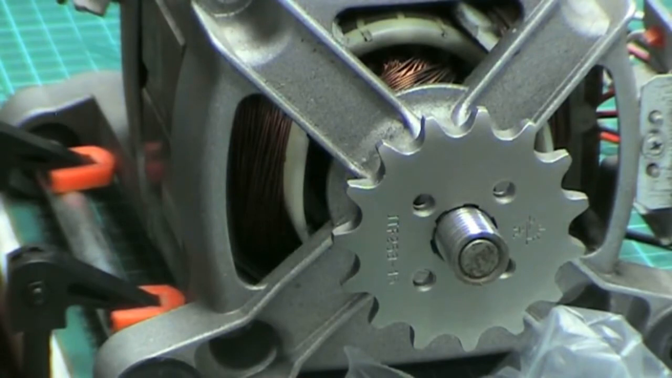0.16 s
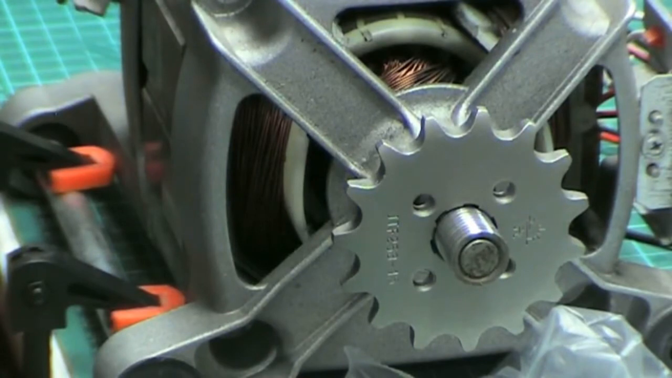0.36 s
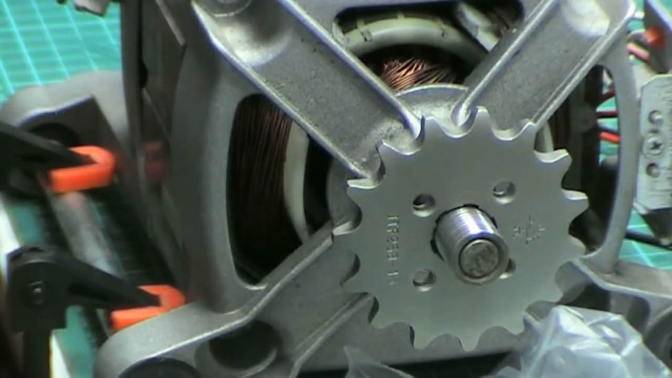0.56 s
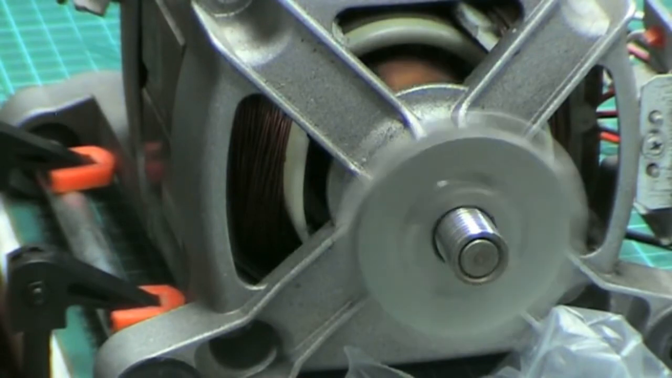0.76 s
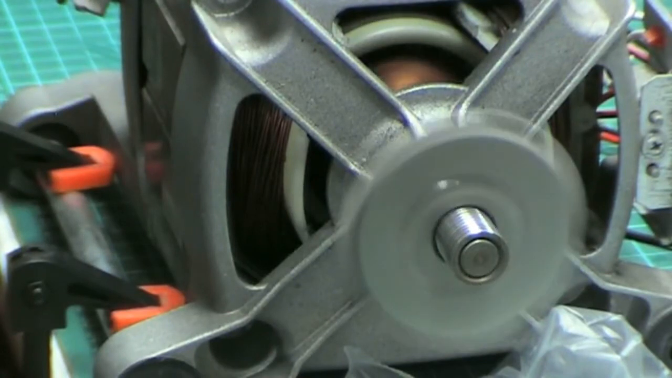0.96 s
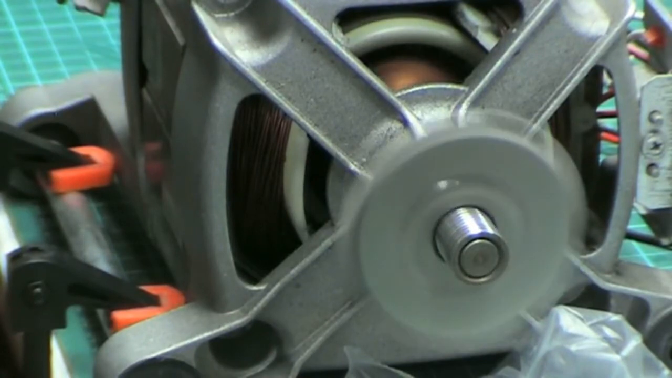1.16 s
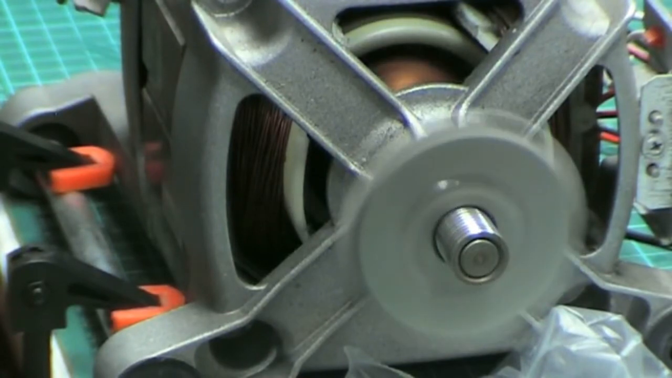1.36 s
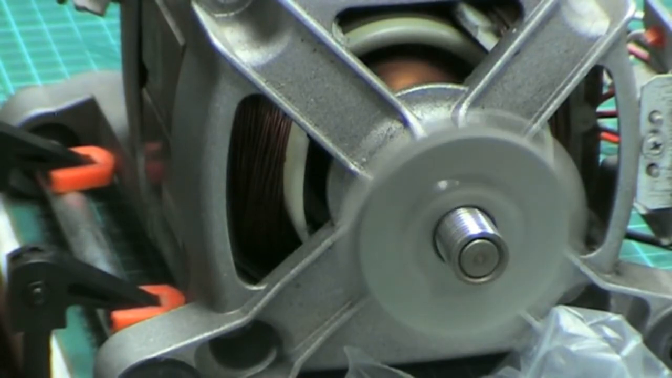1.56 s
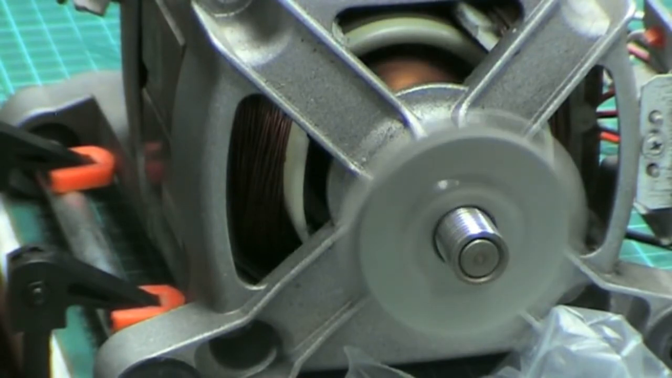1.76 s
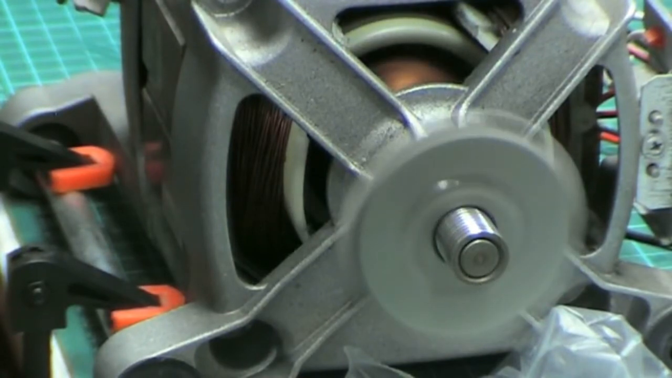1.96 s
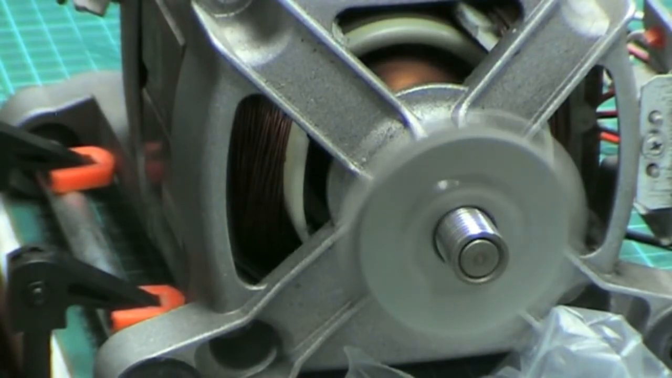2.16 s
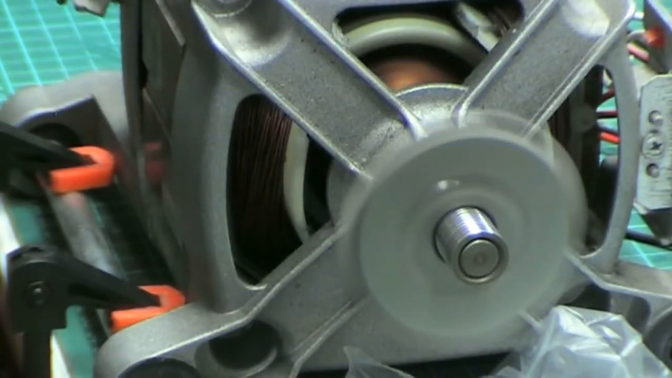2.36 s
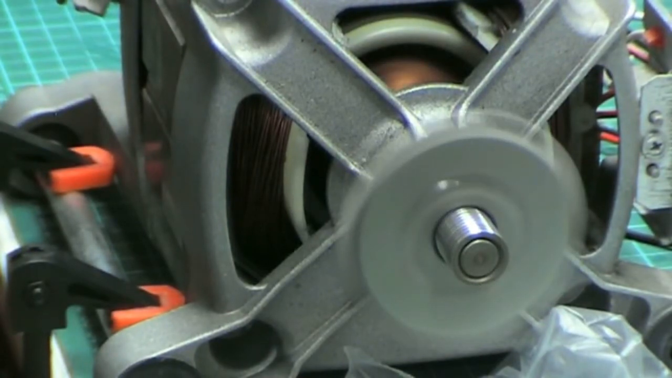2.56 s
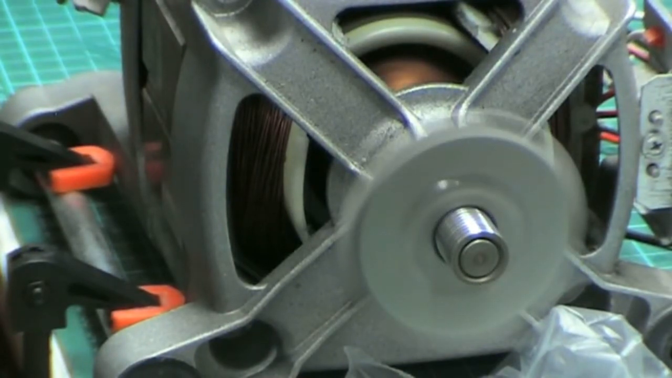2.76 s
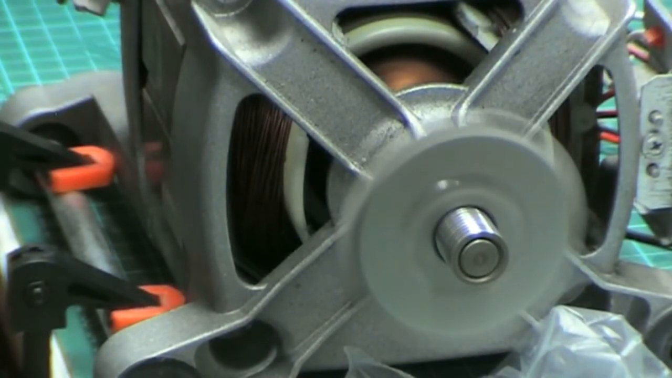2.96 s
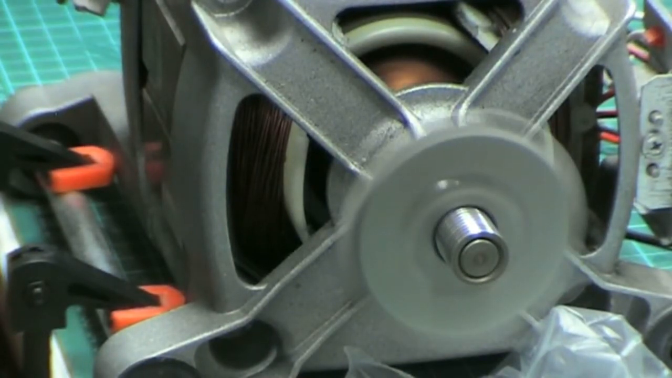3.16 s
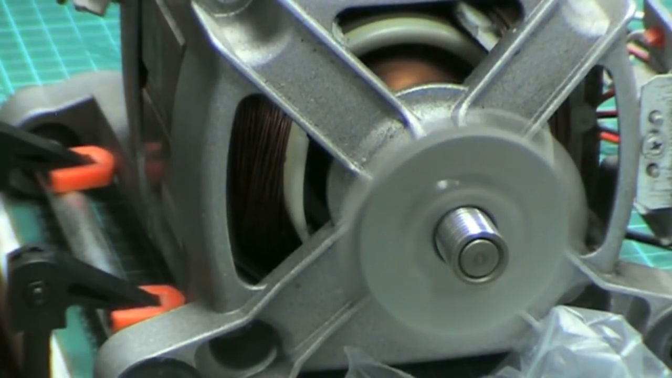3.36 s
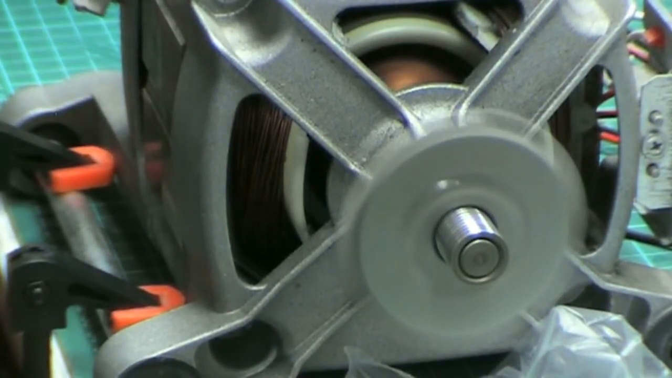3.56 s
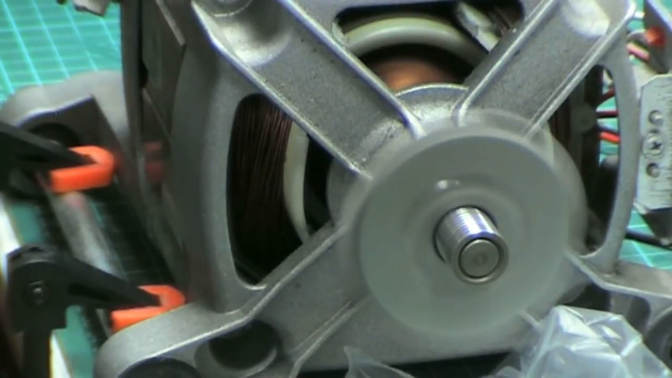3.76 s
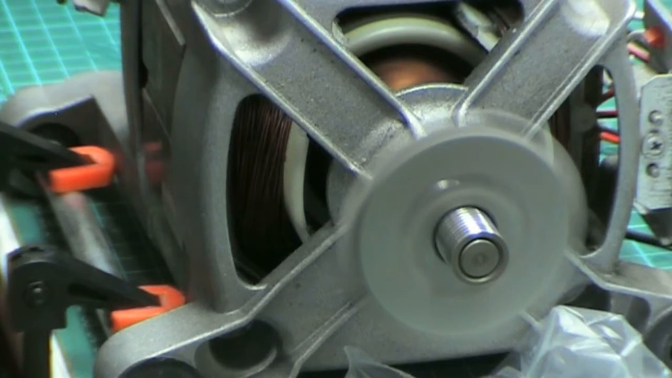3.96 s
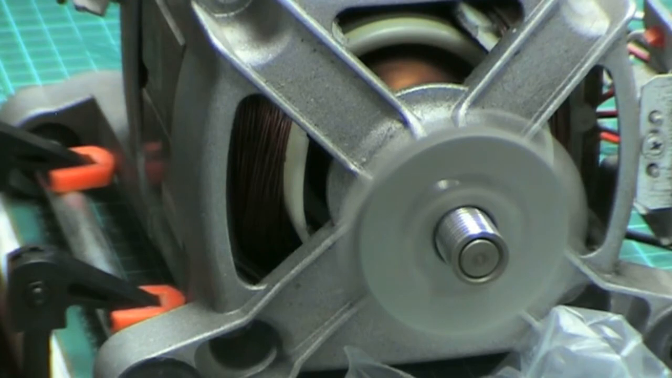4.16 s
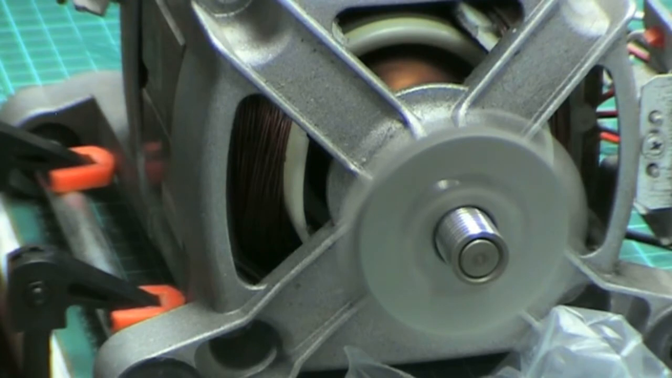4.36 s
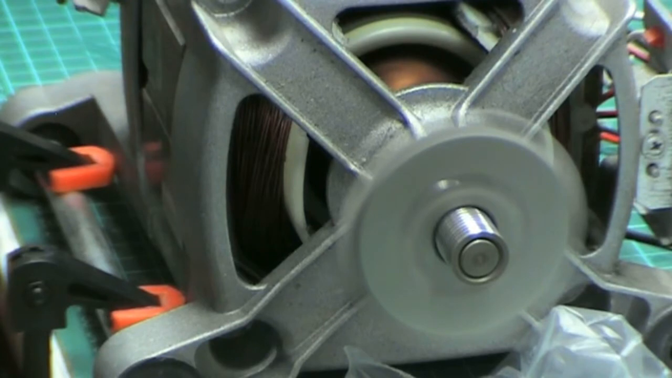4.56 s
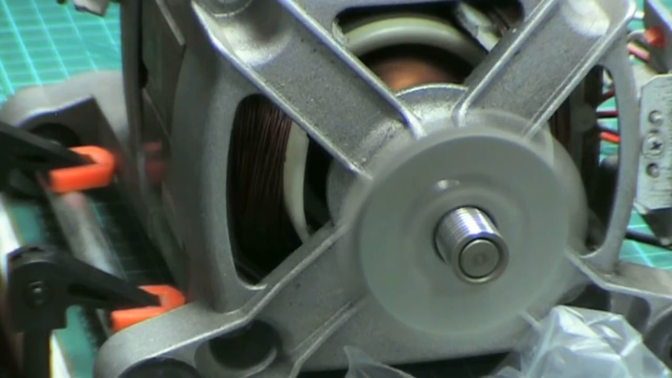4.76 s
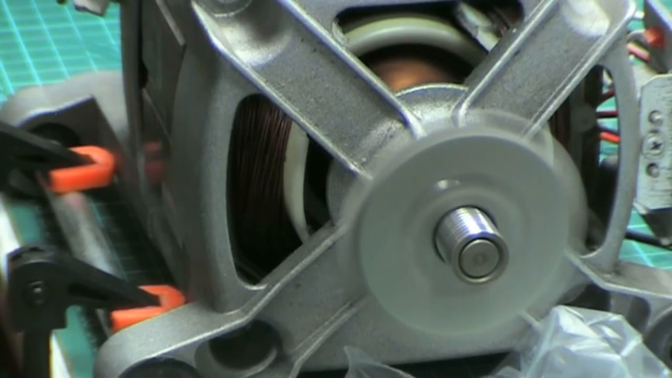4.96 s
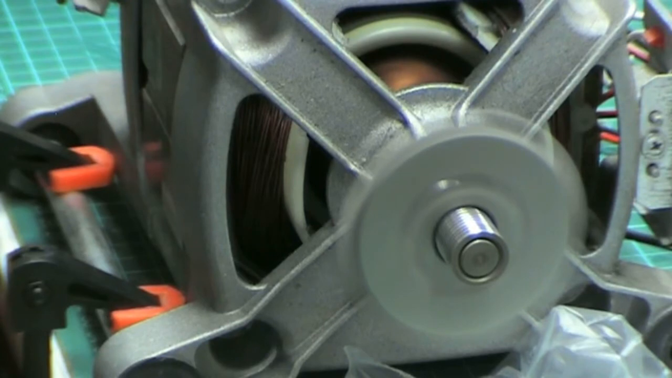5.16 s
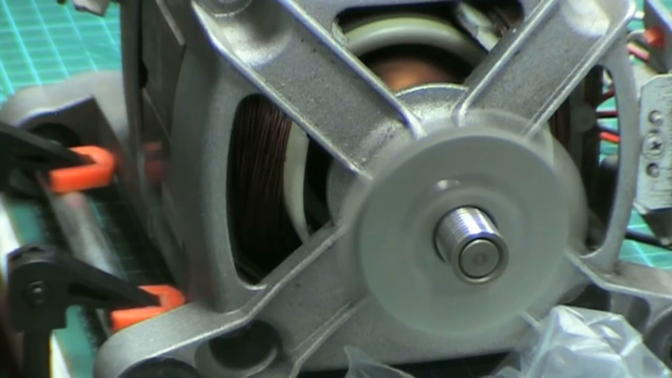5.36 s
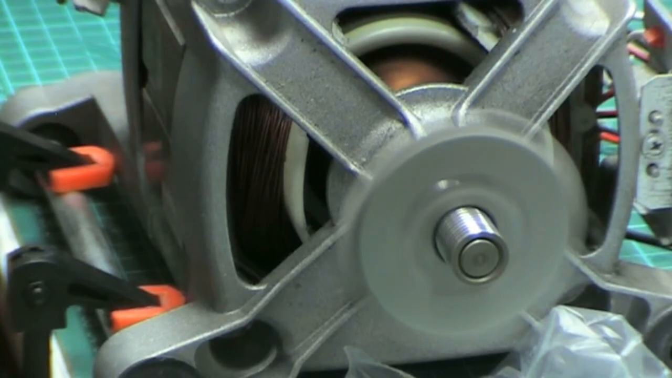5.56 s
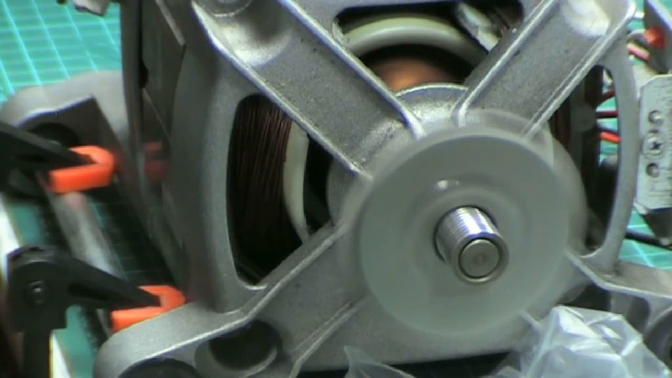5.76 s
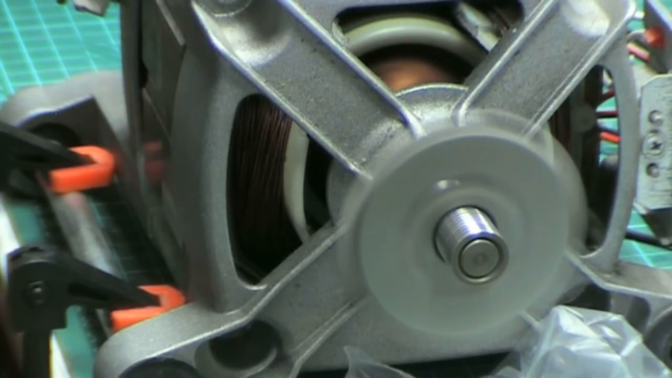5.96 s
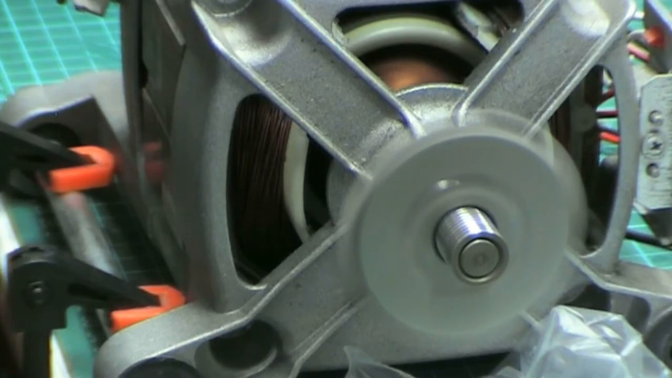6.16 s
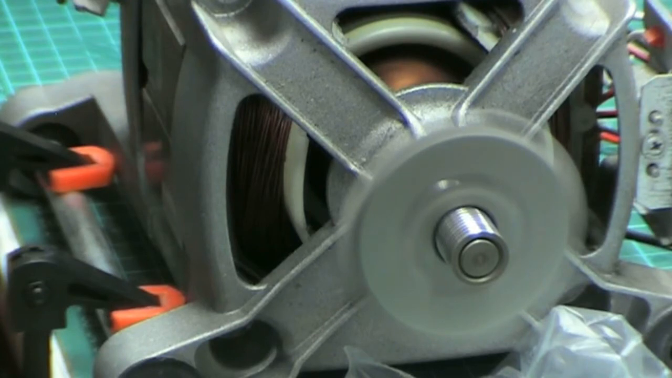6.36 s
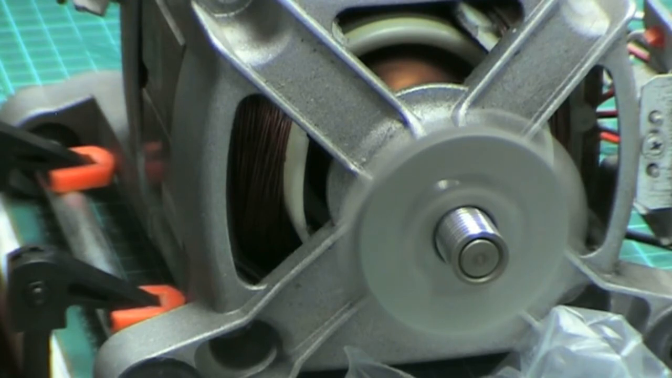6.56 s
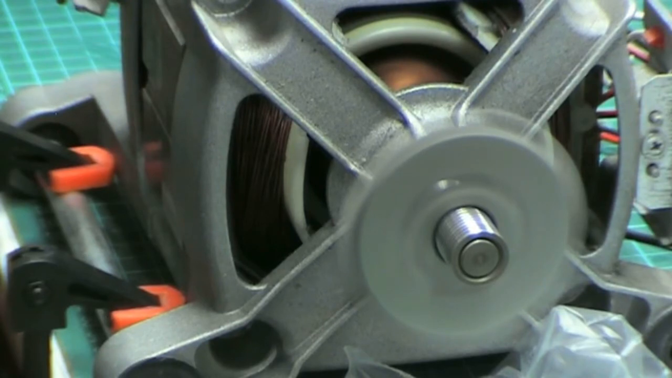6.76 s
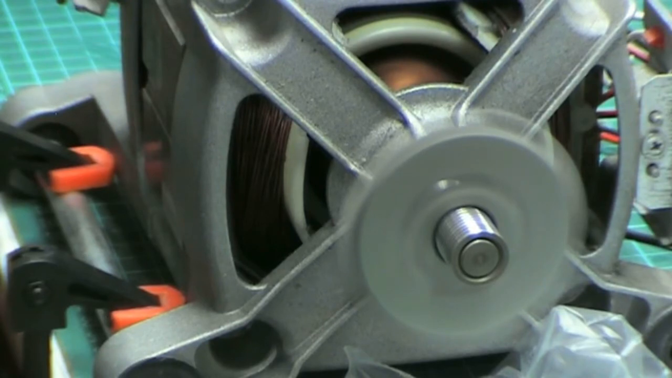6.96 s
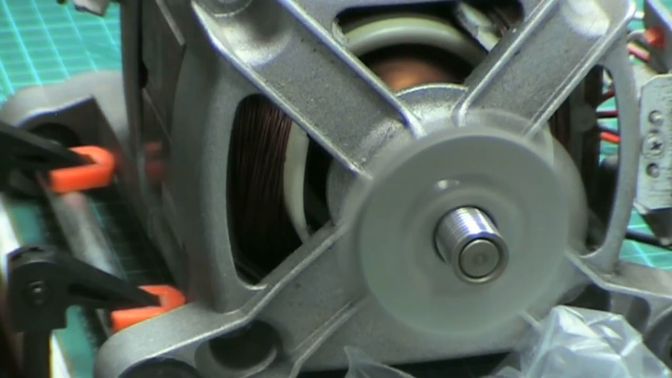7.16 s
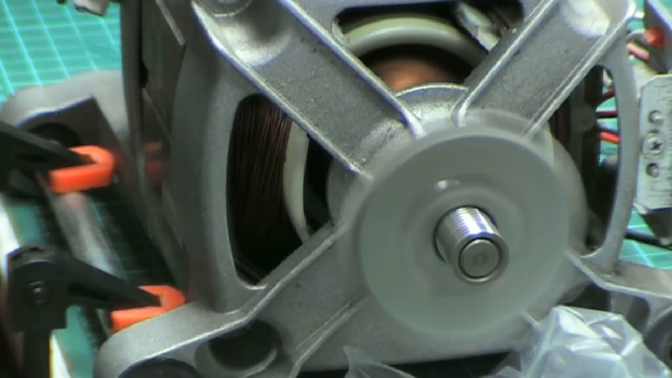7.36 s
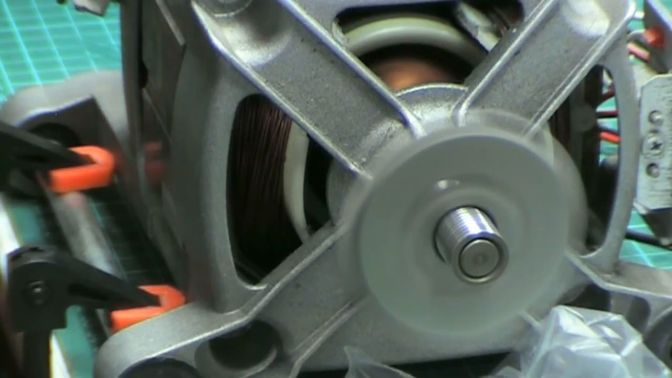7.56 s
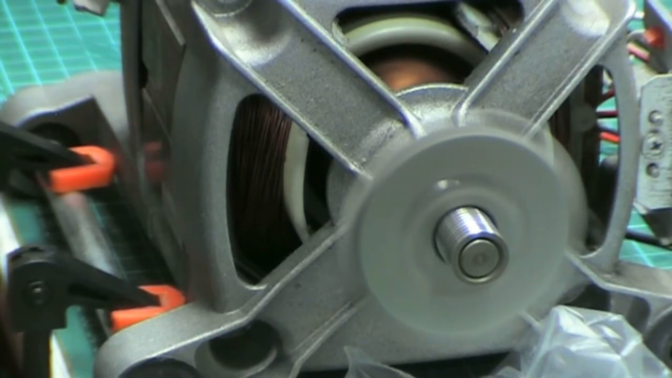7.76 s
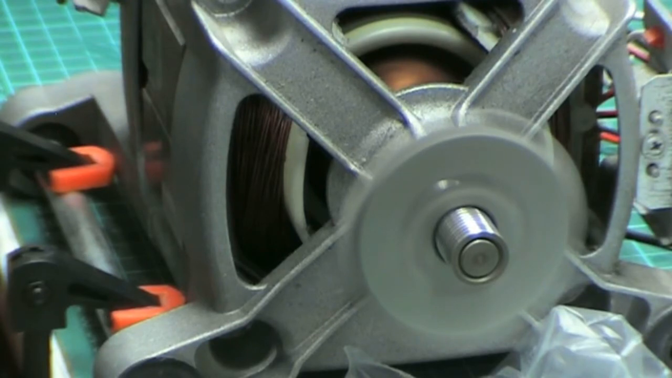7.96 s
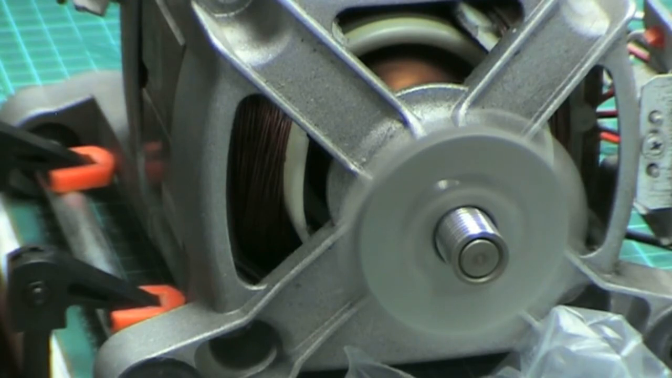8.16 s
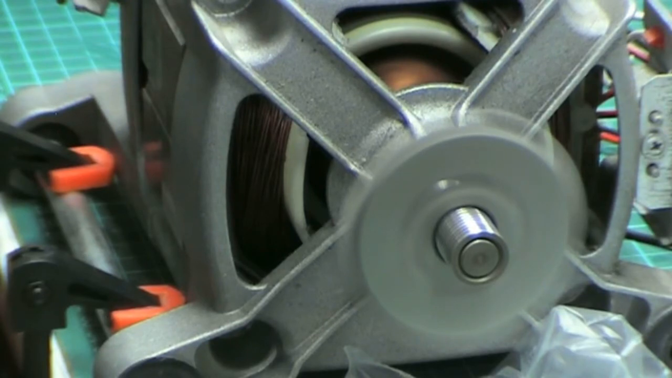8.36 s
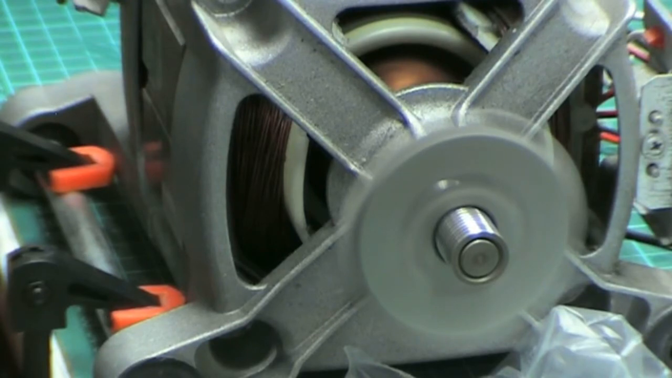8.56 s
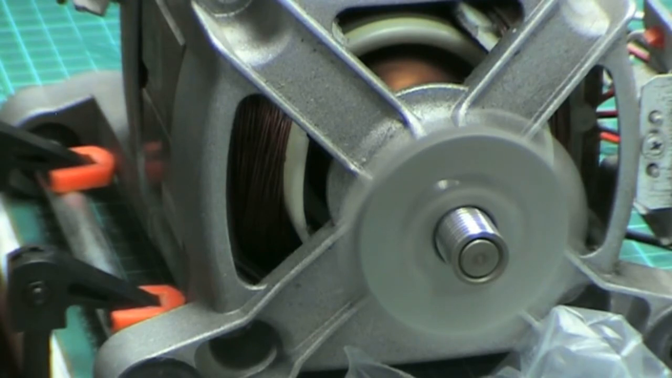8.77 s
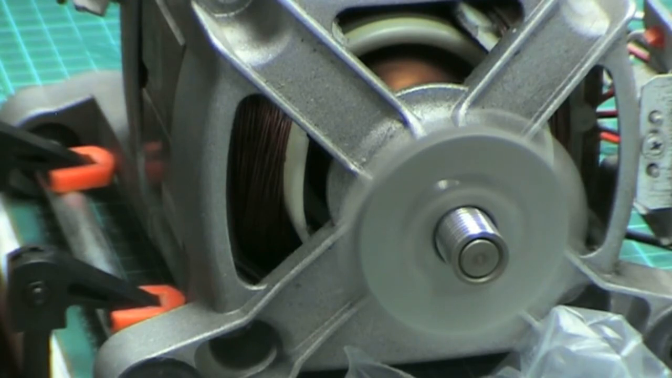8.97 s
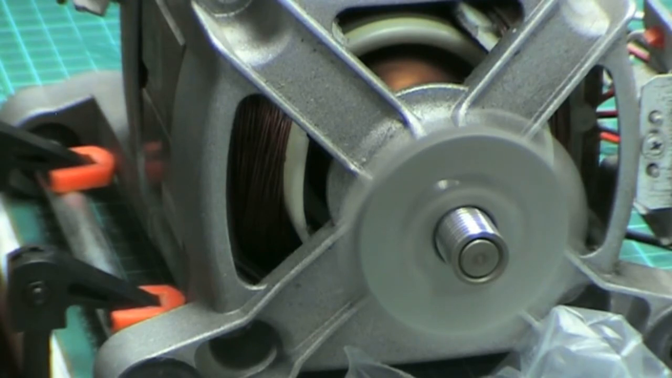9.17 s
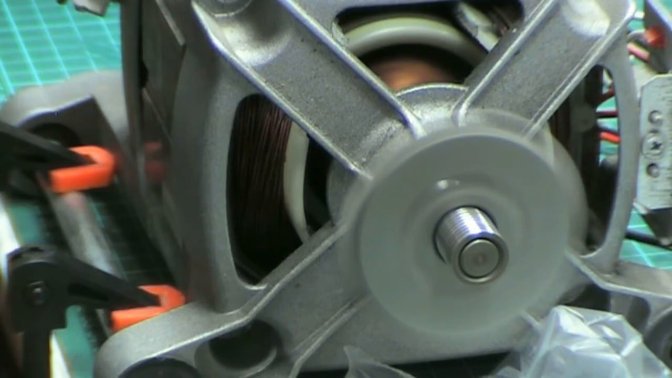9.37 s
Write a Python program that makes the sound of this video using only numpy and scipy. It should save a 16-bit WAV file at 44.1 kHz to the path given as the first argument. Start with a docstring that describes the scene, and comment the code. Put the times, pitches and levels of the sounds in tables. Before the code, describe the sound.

A sharp switch click starts an electric motor, which rises to an even whine with brush hiss, followed by a last click.

```python
"""A bare brushed motor with a sprocket runs up on a workbench and settles near 41 turns a second.
Commutator bars, rotor and ball bearings sing through the resonances of the cast frame, over brush hiss;
on the way up a loose bearing rattles, the bench buzzes and a brush squeals. A switch snaps on amid lighter
lever clicks and dull bench knocks, and snaps again at the very end. The quiet workshop hums and echoes."""
import sys
import numpy as np
from scipy import signal
from scipy.fft import rfft, irfft, next_fast_len
from scipy.io import wavfile
from scipy.ndimage import uniform_filter1d, minimum_filter1d, map_coordinates

SR = 44100
rng = np.random.default_rng(int(sys.argv[2]) if len(sys.argv) > 2 else 0)


def wrap_up_sound(samples):
    """Save the sound to the file named by the first command line argument, as 16-bit audio."""
    columns = np.atleast_2d(samples).T
    # keep every value between -1 and 1, then stretch to whole-number steps
    tamed = np.clip(columns, -1, 1)
    steps = np.round(tamed * 32767).astype(np.int16)
    wavfile.write(sys.argv[1], SR, steps)


N = 415422


def amp(db):
    """Gain of a level in dB."""
    return 10 ** (np.asarray(db) / 20)


def unit_rms(x):
    """x scaled to rms 1."""
    return x / np.sqrt(np.mean(x ** 2) + 1e-20)


def along(points, hz):
    """Interpolate (f/Hz, value) points on a log axis."""
    f, values = np.transpose(points)
    return np.interp(np.log(hz + 1), np.log(f + 1), values)


def wobble(rate_hz):
    """Smooth random curve with rate_hz knots a second."""
    knots = rng.standard_normal(int(N * rate_hz / SR) + 4)
    return map_coordinates(knots, [np.arange(N) * rate_hz / SR])


def filtered(x, response):
    """x through the zero-phase gain response(hz)."""
    size = next_fast_len(x.shape[-1] + 8192)
    return irfft(rfft(x, size) * response(np.fft.rfftfreq(size, 1 / SR)), size)[..., :x.shape[-1]]


def resonances(modes, hz):
    """Summed power of (f/Hz, width/Hz, level/dB) modes."""
    return sum(amp(db) ** 2 / (1 + (2 * (hz - centre) / width) ** 2) for centre, width, db in modes)


def spread(pair, coherence):
    """Two unrelated signals mixed to stereo with the given left-right coherence."""
    angle = lambda hz: np.arccos(np.clip(along(coherence, hz), -1, 1)) / 2
    mid, side = filtered(pair, lambda hz: np.array([np.cos(angle(hz)), np.sin(angle(hz))]))
    return np.array([mid + side, mid - side])


def flicker(x, depth_db):
    """Random gain in patches of frequency and time, mean power kept."""
    spectra = signal.stft(x, nperseg=1024)[2]
    patches = uniform_filter1d(uniform_filter1d(rng.standard_normal(spectra.shape), 3, axis=0), 12, axis=1)
    gain = amp(depth_db * unit_rms(patches) - depth_db ** 2 * np.log(10) / 20)
    return signal.istft(spectra * gain, nperseg=1024)[1][:N]


# Air noise spectrum: f/Hz, relative density/dB
AIR_SPECTRUM = [(15, -50), (40, -34), (90, -28), (180, -11), (280, -5), (830, -2), (1300, -5), (2500, -10),
                (3530, -7.5), (4200, -12), (8000, -18), (14300, -26), (15500, -50)]
# Air noise stereo image: f/Hz, coherence
AIR_COHERENCE = [(60, 0.38), (240, 0.15), (950, 0.41), (3770, 0.75), (15000, 0.0)]
# Mains hum and a faint room tone: f/Hz, level/dB
HUM_TONES = [(120, -71), (240, -83.5), (836, -71)]


def workshop():
    """Soft air noise and mains hum, both wavering slightly."""
    t = np.arange(N) / SR
    air = spread(filtered(rng.standard_normal((2, N)), lambda hz: amp(along(AIR_SPECTRUM, hz))),
                 AIR_COHERENCE)
    hum = sum(np.sqrt(2) * amp(db + 0.42 * wobble(2.66)) * np.sin(2 * np.pi * hz * t)
              for hz, db in HUM_TONES)
    return amp(-62.5 + 1.6 * wobble(4.6)) * unit_rms(air) + hum


# Room decay: f/Hz, t60/s
ROOM_T60 = [(300, 0.1), (800, 0.41), (2000, 0.42), (5500, 0.3), (13000, 0.26)]
# Stereo image of echoes and switch: f/Hz, coherence
FAR_COHERENCE = [(60, 0.96), (240, 0.89), (950, 0.86), (3770, 1), (15000, 0.14)]


def in_room(start_s, direct, send):
    """Stereo track with a direct sound at start_s and the room's echo of send."""
    hz, t, spectra = signal.stft(rng.standard_normal((2, SR // 2)), SR, nperseg=128)
    decay = amp(-60 * t / along(ROOM_T60, hz)[:, None])
    tail = spread(signal.istft(spectra * decay, SR, nperseg=128)[1], FAR_COHERENCE)
    tail /= np.linalg.norm(tail[0])
    sound = signal.fftconvolve(np.pad(send, (60, 0))[None], tail, axes=1)
    sound[:, :direct.shape[1]] += direct
    return np.pad(sound, ((0, 0), (round(start_s * SR), N)))[:, :N]


# Knocks through the bench: t/s, level/dB, f/Hz, t60/s
BENCH_KNOCKS = [(0.496, -58, 252, 0.18), (0.743, -39.5, 695, 0.17), (.775, -43, 417, 0.26),
                (.99, -42, 850, 0.09), (2.51, -41, 570, 0.27), (2.511, -33, 1800, .07),
                (9.363, -43, 735, 0.11)]


def bench_knocks():
    """Dull thuds: a broad noise band with a soft attack and a quick decay."""
    out, t = np.zeros((2, N)), np.arange(SR // 4) / SR
    attack = 1 - np.exp(-t / 0.0015)
    for start_s, db, centre_hz, t60_s in BENCH_KNOCKS:
        mode = [(centre_hz, 1.34 * centre_hz, 0)]
        band = filtered(rng.standard_normal(len(t)),
                        lambda hz: resonances(mode, hz) * hz ** 2 / (hz ** 2 + 250 ** 2))
        thud = amp(db - 60 * t / t60_s) * attack * unit_rms(band)
        out += in_room(start_s, np.array([thud, thud]), send=amp(-2) * thud)
    return out


# Switch throws: t/s, peak before limiting/dB, tilt/(dB/octave)
SWITCH_THROWS = [(.7335, 4, 2), (9.3617, 3, .7)]
# Lighter lever clicks: t/s, peak/dB, tilt/(dB/octave), room send/dB
LEVER_CLICKS = [(.630, -35.5, 0, 11.5), (.835, -20, 4, 14), (0.9639, -24.5, 3.5, 18),
                (1.194, -18.5, 3.5, 13)]
# Snap spectrum: f/Hz, gain/dB
SNAP_SPECTRUM = [(300, -15), (1400, -18.5), (2400, -2), (3400, -5.5), (5000, 0.4), (7500, -2.5),
                 (10000, -1.5), (13000, 2), (15500, -8)]
# Switch case modes: f/Hz, width/Hz, level/dB
CASE_MODES = [(2450, 400, 3.5), (4970, 500, 7), (7240, 640, 5.5), (9100, 630, 8)]


def switch():
    """Each snap is a blow and a quick rebound that ring the case; a faint tick leads each throw."""
    out, t = np.zeros((2, N)), np.arange(SR // 40) / SR - .001
    rebound_s, t60_s, lead_s, edge_hz = .0013, .0075, .0049, 10900
    throws = [(s, db, tilt, 6) for s, db, tilt in SWITCH_THROWS]  # columns as LEVER_CLICKS
    ticks = [(s - lead_s, db - 30, 9, 15) for s, db, _ in SWITCH_THROWS]
    blows = sum(size * (t > at) * amp(-60 * (t - at) / t60_s) for at, size in [(0, .45), (rebound_s, .33)])
    impulse = signal.unit_impulse(len(t), np.argmax(blows))
    for start_s, db, tilt, room_db in throws + ticks + LEVER_CLICKS:
        colour_db = lambda hz: along(SNAP_SPECTRUM, hz) + tilt * np.log2((hz + 1) / 5000)
        colour = lambda hz: amp(colour_db(hz)) / (1 + (hz / edge_hz) ** 8)
        ring = lambda hz: np.sqrt(1 + resonances(CASE_MODES, hz))
        crack = filtered(blows * rng.standard_normal((2, len(t))), lambda hz: colour(hz) * ring(hz))
        crack = spread(crack, FAR_COHERENCE)
        crack *= amp(db) / np.abs(crack).max()
        send = filtered(impulse, lambda hz: colour(hz) * np.sqrt(ring(hz)))  # room averages all directions
        send *= amp(db + room_db) / np.linalg.norm(send)
        out += in_room(start_s + t[0], crack, send)
    return out


# Target speed, sagging slightly: t/s, speed/(turns/s)
TARGET_SPEED = [(2.4, 40.96), (3.3, 40.86), (4.5, 40.86), (6.1, 40.755), (8.2, 40.63), (9.42, 40.65)]
FULL_RPS = TARGET_SPEED[-1][1]
ON_S, RUN_UP_S, RUN_UP_EXPONENT = .735, 1.522, .546


def rotor_speed():
    """Turns per second: a quick pull from rest that flattens toward the target."""
    t = np.arange(N) / SR
    target_rps = np.interp(t, *np.transpose(TARGET_SPEED))
    return target_rps * np.tanh(np.maximum(t - ON_S, 0) / RUN_UP_S) ** RUN_UP_EXPONENT


# Broad radiation of the frame: f/Hz, gain/dB
FRAME_SPECTRUM = [(60, -26), (150, -14.5), (250, -7), (400, -8), (800, -4.5), (1100, -12), (2000, -10),
                  (4000, -9.5), (7000, -13), (10500, -15.5), (12000, -20), (15000, -31), (15700, -60)]
# Frame modes: f/Hz, width/Hz, level over the broad curve/dB
FRAME_MODES = [(400, 60, 11.5), (554, 18, 7), (670, 37, 0.5), (1347, 230, 6), (3054, 31, 15),
               (3325, 165, 15), (4582, 144, 12), (5290, 620, 8), (5670, 260, 4), (7825, 104, 7),
               (7940, 870, 4.5), (9200, 310, 1.5), (10440, 1140, 5.5)]
RIPPLE_DB = 2.2 * np.clip(rng.standard_normal(400), -1.5, 1.5)


def frame_gain(hz):
    """Gain from a force inside the motor to sound; countless small modes ripple it."""
    ripple_db = np.interp(hz, 70 * np.arange(len(RIPPLE_DB)), RIPPLE_DB)
    return amp(along(FRAME_SPECTRUM, hz) + ripple_db) * np.sqrt(1 + resonances(FRAME_MODES, hz))


def rotor_force(turns, strong, faint_orders, faint_db, scatter_db):
    """Force locked to the rotor: strong (order, level/dB) tones among faint ones of random level."""
    table_turns, steps_per_turn = 100, 2048
    lines = np.zeros(table_turns * steps_per_turn // 2 + 1, complex)
    uneven_db = scatter_db * np.minimum(rng.standard_normal(len(faint_orders)), 1)
    low_cut = np.sqrt(1 + (28 / faint_orders) ** 2)
    lines[np.round(faint_orders * table_turns).astype(int)] = amp(faint_db + uneven_db) / low_cut
    orders, heard_db = np.transpose(strong)
    lines[np.round(orders * table_turns).astype(int)] = amp(heard_db) / frame_gain(orders * FULL_RPS)
    lines *= np.exp(2j * np.pi * rng.random(len(lines)))
    wave = irfft(lines) * table_turns * steps_per_turn / np.sqrt(2)
    return map_coordinates(wave, [turns * steps_per_turn % len(wave)], mode="grid-wrap")


# Rotor tones: order/(1/turn), full-speed level/dB
ROTOR_TONES = [(10, -64), (15, -57), (17, -62), (57, -60), (70, -57), (71, -55), (74, -47), (75, -54),
               (82, -56), (85, -57), (115, -56), (125, -59), (131, -57), (132, -56)]
# Commutator bar harmonics 1 to 8: full-speed level/dB
BAR_LEVELS_DB = [-59, -47, -56, -60, -61, -61, -64, -68]
# Bar harmonics that grow with current: harmonic number
LOADED_HARMONICS = [8]
BARS, DB_PER_LOAD = 36, 25


def armature(turns, load):
    """Rotor and commutator tones; current lifts the low growl and a whistle, and weakens the whine."""
    bars = [(BARS * k, db) for k, db in enumerate(BAR_LEVELS_DB, 1)]
    loaded = [bars[k - 1] for k in LOADED_HARMONICS]
    others = [tone for tone in ROTOR_TONES + bars if tone not in loaded]
    growl = rotor_force(turns, [(2, -80)], np.arange(1, BARS), faint_db=-64, scatter_db=4)
    whine = rotor_force(turns, others, np.arange(BARS, 380), faint_db=-64, scatter_db=8)
    jittered = turns + .0006 * wobble(30)
    whistle = rotor_force(jittered, loaded, np.arange(BARS, 380, BARS), faint_db=-90, scatter_db=1)
    # brushes repeat less well until the speed settles
    return amp(-DB_PER_LOAD * load) * whine + amp(DB_PER_LOAD * load) * (growl + whistle)


# Balls passing over the race: harmonic number, full-speed level/dB
RACE_TONES = [(3, -67), (15, -62), (16, -50), (17, -45), (18, -47), (24, -55)]
# Ball spin: harmonic number, cage sideband number, full-speed level/dB
BALL_TONES = [(4, 1, -57), (9, 0, -64), (16, 1, -63), (34, 1, -59), (38, 1, -60), (39, 1, -56),
              (39, 2, -56), (39, 3, -52), (39, 4, -54), (40, 0, -55), (41, 1, -57), (41, 2, -46),
              (43, 1, -51), (55, 4, -54)]
RACE_PER_TURN, SPIN_PER_TURN, CAGE_PER_TURN = 4.7462, 2.0083, .4034


def bearings(turns):
    """Harmonics of balls passing over the race, and of ball spin with cage sidebands."""
    strong = [(k * RACE_PER_TURN, db) for k, db in RACE_TONES]
    strong += [(k * SPIN_PER_TURN + m * CAGE_PER_TURN, db) for k, m, db in BALL_TONES]
    spin_orders = np.add.outer(SPIN_PER_TURN * np.arange(1, 188), CAGE_PER_TURN * np.arange(5)).ravel()
    faint_orders = np.concatenate([spin_orders, RACE_PER_TURN * np.arange(1, 80)])
    slipping = turns + 0.00069 * wobble(6)
    return rotor_force(slipping, strong, faint_orders, faint_db=-69, scatter_db=9)


# Brush friction swing at 2, 3 and 4 cycles a turn: depth/dB
SCRAPE_DEPTHS_DB = [1, 1, 2]


def brush_hiss(turns, speed_ratio, load):
    """Brush hiss through the frame; the scraping is harder at some places on the commutator."""
    level_db = -44 + 32.5 * np.log10(speed_ratio) + 34 * load
    swing_db = sum(db * np.sin(2 * np.pi * k * turns) for k, db in enumerate(SCRAPE_DEPTHS_DB, 2))
    swing_db += 1.05 * wobble(60)
    noise_pair = []  # independent noises for stereo width
    for _ in range(2):
        scrape = filtered(amp(swing_db) * rng.standard_normal(N), frame_gain)
        noise_pair.append(unit_rms(flicker(scrape, depth_db=1.5)))
    return amp(level_db) * np.array(noise_pair)


def shaken(modes, burst_db):
    """Modes driven by quick uneven noise bursts, rms 1."""
    bursts = amp(burst_db * wobble(55.07)) * rng.standard_normal(N)
    response = lambda hz: resonances(modes, hz) ** 0.62 * hz ** 2 / (hz ** 2 + 300 ** 2)
    return unit_rms(filtered(bursts, response))


# Run-up vibration: speed/(turns/s), rattle level/dB, buzz level/dB
SHAKE_LEVELS = [(14, -73, -77), (18, -55, -60), (23.1, -45, -56.5), (29.2, -38.5, -42.5),
                (33.7, -41, -48.5), (37.4, -44, -49.5), (39, -46, -59), (39.7, -75, -75)]
# Mode shaken by the loose bearing: f/Hz, width/Hz, level/dB
RATTLE_MODES = [(3302, 143, 3)]
# Buzzing frame and bench modes: f/Hz, width/Hz, level/dB
BUZZ_MODES = [(540, 23, 5), (1245, 210, -1.5), (1804, 98, -2.5)]


def rattle_and_buzz(speed_rps):
    """The loose bearing rattles and the frame and bench buzz while the speed climbs."""
    rps, rattle_db, buzz_db = np.transpose(SHAKE_LEVELS)
    rattle = amp(np.interp(speed_rps, rps, rattle_db)) * shaken(RATTLE_MODES, burst_db=0.5)
    buzz = amp(np.interp(speed_rps, rps, buzz_db)) * shaken(BUZZ_MODES, burst_db=3)
    return rattle + buzz


# Sprung brush mode: f/Hz, width/Hz, level/dB
SQUEAL_MODES = [(7380, 22, 0)]


def brush_squeal(speed_rps):
    """A brush chatters on its spring within one range of speeds."""
    gate = uniform_filter1d(1. * (speed_rps > 26.5) * (speed_rps < 38.4), size=2000)
    return amp(-53) * gate * shaken(SQUEAL_MODES, burst_db=2.5)


# Motor stereo image: f/Hz, coherence
MOTOR_COHERENCE = [(60, 0.4), (180, 1), (550, 0.95), (1650, 1), (4000, 0.96), (7000, 0.91), (10000, 0.39),
                   (15000, 0.47)]
TONES_DB_PER_DECADE = 95


def motor():
    """Rotor and bearing tones swell and sweep through fixed frame modes, over hiss, rattle and squeal."""
    speed_rps = rotor_speed()
    turns = np.cumsum(speed_rps) / SR
    running = turns > 0
    speed_ratio = np.maximum(speed_rps / FULL_RPS, .05)
    load = np.clip(1 - speed_ratio, 0, .14)  # current is high while the rotor is slow
    tones_db = TONES_DB_PER_DECADE * np.log10(np.minimum(speed_ratio + 0.059, 1))
    force = armature(turns, load) + bearings(turns)
    tones = amp(tones_db) * flicker(filtered(force, frame_gain), depth_db=1.2)
    hiss = running * brush_hiss(turns, speed_ratio, load)
    direct = running * (tones + rattle_and_buzz(speed_rps) + brush_squeal(speed_rps))
    bench_echo = rng.standard_normal(2048) * np.exp(-np.arange(2048) / 300)
    reflected = signal.fftconvolve(direct, bench_echo / np.linalg.norm(bench_echo))[:N]
    return spread(np.array([direct, reflected]) + hiss, MOTOR_COHERENCE)


def scene():
    """Motor, switch, bench and room in stereo."""
    return motor() + switch() + bench_knocks() + workshop()


# Microphone balance: f/Hz, left minus right/dB
MIC_BALANCE = [(60, 0), (180, -1.5), (550, -2), (1650, 0.5), (4970, -0.5), (15000, -2.5)]
TOP_HZ, CEILING = 15700, .95


def record(dry):
    """Band-limited stereo microphone, a little more sensitive on the right; a limiter holds the snaps."""
    ports = filtered(dry, lambda hz: amp(np.outer([.5, -.5], along(MIC_BALANCE, hz))) * (hz < TOP_HZ))
    needed_gain = np.minimum(1, CEILING / (np.abs(ports).max(axis=0) + 1e-9))
    gain = uniform_filter1d(minimum_filter1d(needed_gain, size=129), size=65)
    return filtered(gain * ports, lambda hz: hz < TOP_HZ)


dry = scene()
out = record(dry)
wrap_up_sound(out)
```